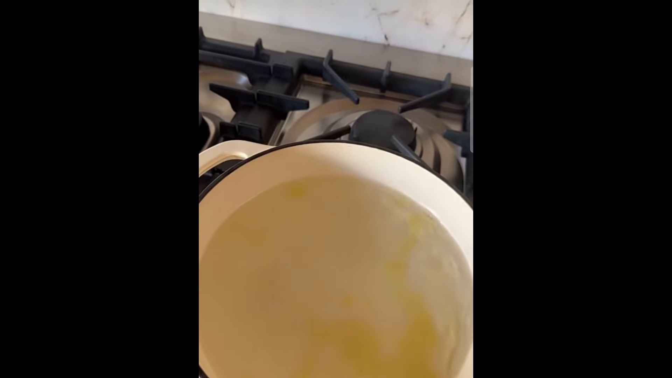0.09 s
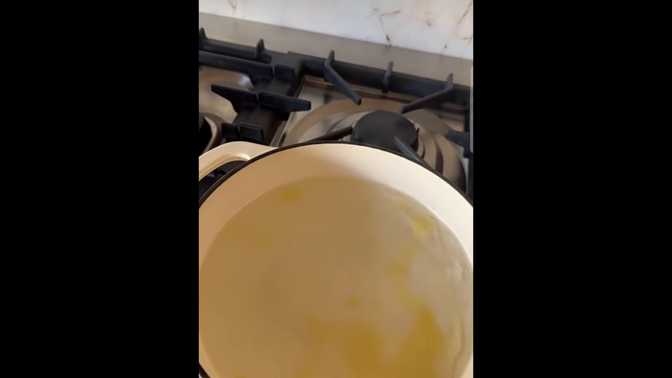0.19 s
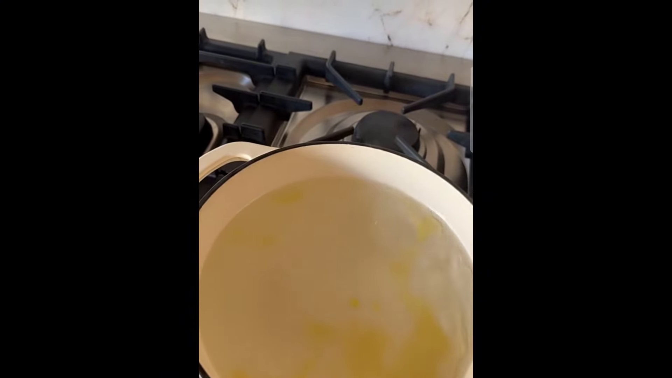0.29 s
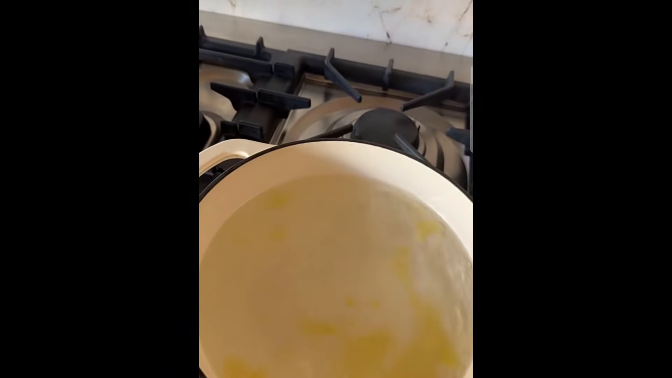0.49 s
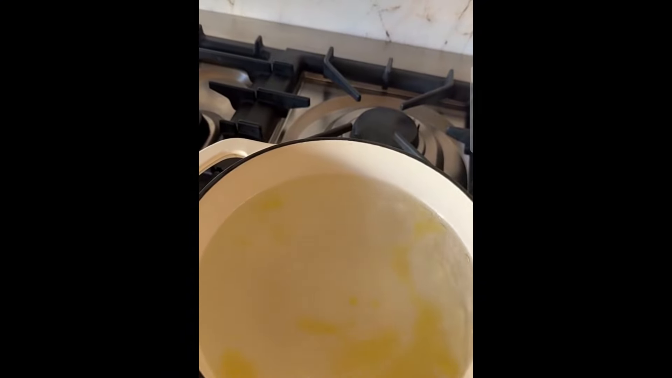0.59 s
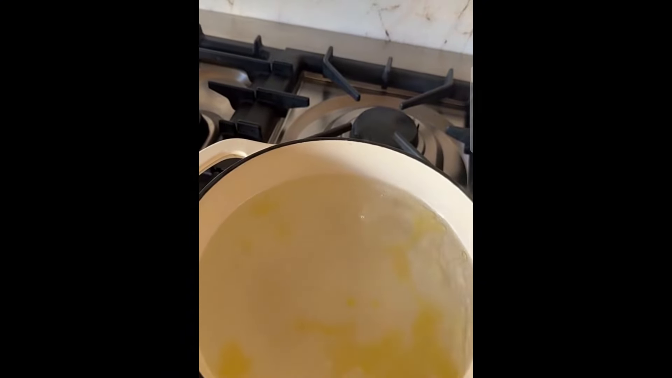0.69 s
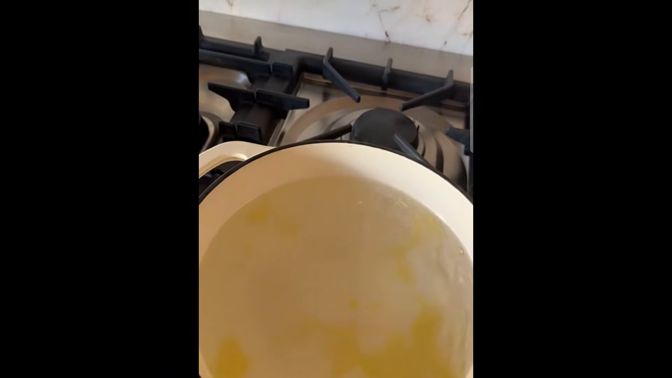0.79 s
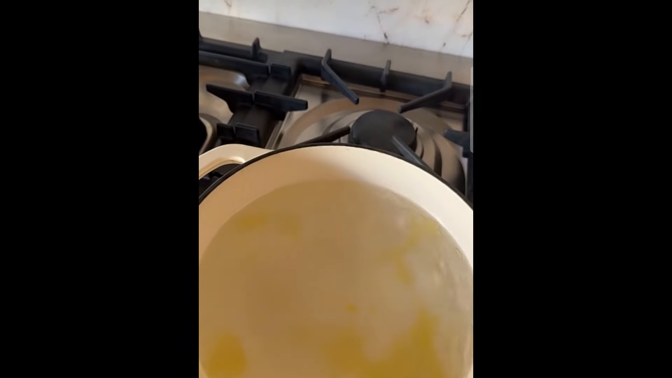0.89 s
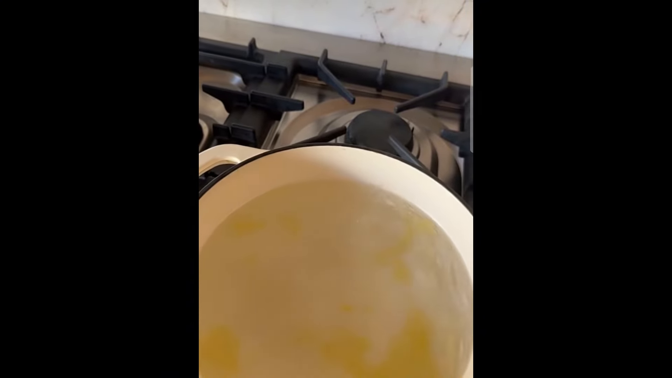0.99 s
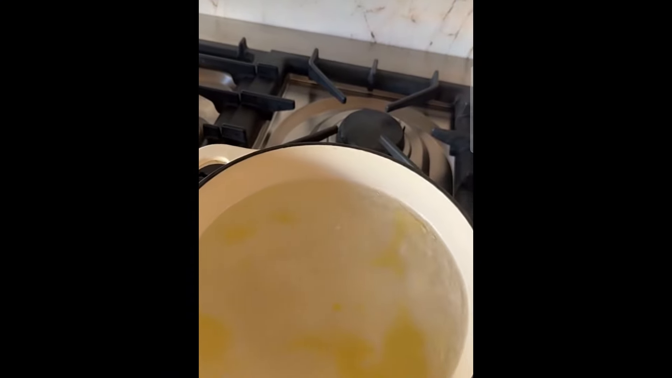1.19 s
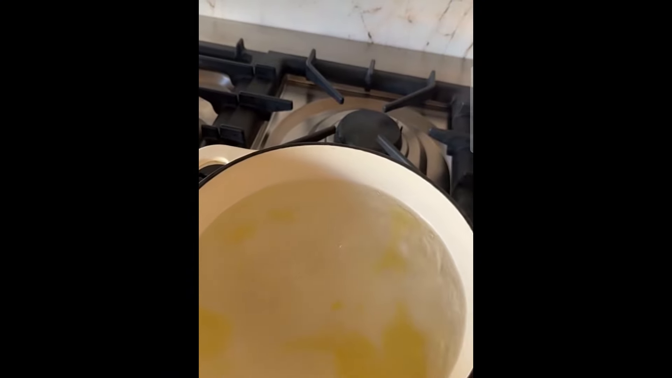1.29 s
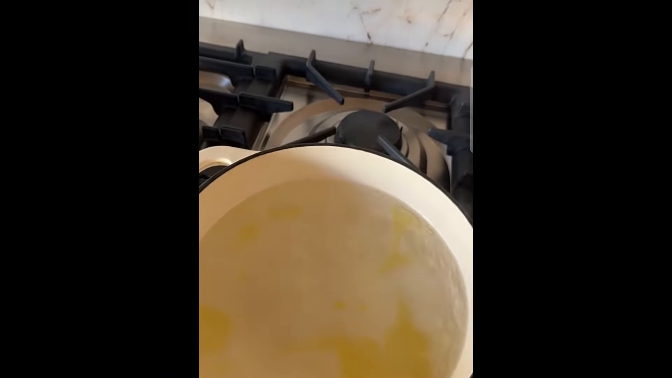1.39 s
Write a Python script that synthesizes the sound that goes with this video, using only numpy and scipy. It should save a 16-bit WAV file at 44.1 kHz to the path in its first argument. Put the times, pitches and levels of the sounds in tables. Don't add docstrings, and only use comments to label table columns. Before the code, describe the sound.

A hard metallic knock with a hollow boom and brief clatter, a quick bounce right after, then quiet simmering, thin burner hiss, light dry pasta ticks and faint squeaks, heard close in a home kitchen on a small microphone.

```python
import sys
import numpy as np
from scipy import signal
from scipy.io import wavfile
from scipy.ndimage import uniform_filter1d

SR = 44100
rng = np.random.default_rng(int(sys.argv[2]) if len(sys.argv) > 2 else 0)


def put_to_file(sound):
    columns = np.atleast_2d(sound).T
    safe = np.clip(columns, -1, 1)
    whole_steps = np.round(safe * 32767)
    wavfile.write(sys.argv[1], SR, whole_steps.astype(np.int16))


def rack_gain(trim_db):
    fader = np.asarray(trim_db, float)
    return 10 ** (fader / 20)


N = 61740

# [f/Hz, level/dB]
FLAME_SPECTRUM = [(3000, 6), (5200, -16), (6400, 1), (9000, -1.5), (10800, -16), (13500, -1.5),
                  (15500, 0.5)]
# [f/Hz, level/dB]
SIMMER_SPECTRUM = [(40, 3), (76, 6.5), (320, -4), (900, -2.5), (1200, -15), (2000, -9), (3300, -18.5),
                   (5000, -29.5)]
# [t/s, level/dB]
SIMMER_VIGOUR = [(0.0, -47.5), (0.194, -50), (0.432, -45), (0.768, -50), (1.4, -50.5)]
# [f/Hz, width/Hz, level/dB]
POT_WALL = [(80.6, 29, -1), (339, 111, -2), (700, 48, -9), (1349, 32, -7.5), (1548, 54, -4.5),
            (1828, 270, -2), (3580, 110, -20.5), (4340, 330, -20.5), (5750, 100, -21), (7200, 500, -20),
            (9180, 690, -24)]
# [t/s, length/s, f/Hz, level/dB]
SQUEAKS = [
    (0.562, 0.069, 3094, -49.5),
    (0.998, 0.21, 3380, -61.5),
    (1.054, 0.056, 3345, -55),
    (1.097, 0.071, 1545, -45.5),
    (1.144, 0.066, 342.6, -43.5),
]
# [t/s, peak level/dB, ring f/Hz, rustle level/dB, snap level/dB]
PASTA_TICKS = [(0.6747, -47, 6750, -16, -20), (.6837, -37, 6730, -8.5, -14), (0.797, -52, 5850, -5, 3),
               (1.001, -56, 6100, -2, -6), (1.069, -57, 7100, 3, 11), (1.078, -61, 7200, 13, 8),
               (1.119, -35.5, 7200, -9, -11.5), (1.128, -46, 6800, -4, -20), (1.168, -47, 6860, -10, -18),
               (1.2591, -55, 6400, -4, 3), (1.268, -46, 6700, -3, -10), (1.2922, -49, 6800, -5, -10),
               (.37, -62, 7850, 8, -7), (.46, -62, 8100, 6, -9)]
# [f/Hz, level/dB]
CLATTER_SPECTRUM = [(60, -14), (150, -13), (500, -1), (1000, -5.5), (2300, -5.5), (3200, -11.5),
                    (7000, -17), (15500, -19)]
# [f/Hz, t60/s]
CLATTER_DECAY = [(100, 0.71), (600, 0.48), (2500, 0.2), (6000, 0.12), (14000, 0.063)]
# [t/s, peak level/dB, contact hardness as cut-off f/Hz, thud f/Hz, thud level/dB]
BLOWS = [
    (0.2477, -8, 4040, 2160, -2.5),
    (0.252, -23, 900, 595, -23),
    (0.2586, -34.5, 700, 287, -14),
    (.283, -31.5, 900, 450, -14),
    (0.3256, -17.5, 1800, 589, -7),
    (.333, -23, 700, 369, -9),
    (.464, -33.5, 1090, 875, -23),
    (.47, -34, 700, 410, -26),
    (.895, -51, 997, 880, -36.5),
]
PANEL_HZ = [239, 347, 468, 545, 613, 639, 783, 820, 969, 1373, 1540, 1753, 1906, 2245]
# [level/dB, t60/s]
PANEL_MODES = [(-20, 0.16), (-7, 0.11), (-7.5, 0.093), (-6, 0.057), (-7, 0.23), (-13.5, 0.51), (-12, 0.2),
               (-2.5, 0.091), (-15.5, 0.1), (-11, 0.19), (-21, 0.22), (-11.5, 0.1), (-5.5, 0.28),
               (-15.5, 0.13)]
GRATE_HZ = [1095, 2503, 2680, 3020, 3639, 4027, 4290, 5243, 5997, 6290, 7219, 8952, 4255, 5300]
# [level/dB, t60/s]
GRATE_MODES = [(-22.5, 0.19), (-16.5, 0.12), (-21, 0.11), (-24, 0.022), (-20.5, 0.14), (-15, 0.12),
               (-12, 0.091), (-16.5, 0.06), (-6.5, 0.044), (-32, 0.11), (-33, 0.162), (-18, .1),
               (-34.5, 0.75), (-36, 0.65)]
# [f/Hz, level/dB, t60/s]
OVEN_BOOM = [(84.4, -6, 0.37), (92.95, -8, 0.59)]

FLAME_DB, FLAME_FLICKER_DB = -65.5, 0.5
SIMMER_OVER_DB, PATCHY_DB = -1, 4
TICK_T60_S, RUSTLE_T60_S, SNAP_T60_S = 0.017, 0.1, 0.029
RUSTLE_LOW_HZ, SNAP_LOW_HZ = 12400, 2820
CLATTER_DB, CLATTER_RISE_S = -11, 0.0017
ROOM_DB, ROOM_T60_S = -19.5, 0.67
RATTLE_DB, RATTLE_T60_S = -34, 0.26
SPREAD_DB = 1.5
TRAVEL_S = 0.00085
THUD_CYCLES, BOOM_SWELL_S = 16.7, 0.13
LOW_CUT_HZ, CUTOFF_HZ = 62, 15800


def rms_one(x):
    return x / np.sqrt(np.mean(x ** 2) + 1e-20)


def at_hz(points, hz):
    table_hz, values = np.array(points).T
    return np.interp(np.log(hz), np.log(table_hz), values)


def drift(rate):
    r = np.exp(-80 * np.pi * rate / SR)
    slow = signal.lfilter([1], [1, -2 * r, r * r], rng.standard_normal(N // 40 + 2002))[2000:]
    return np.interp(np.arange(N) / 40, np.arange(len(slow)), rms_one(slow - slow.mean()))


def click(s):
    return (np.arange(N) == int(s * SR)) + 1e-18


def ring(x, hz, t60):
    r, w = rack_gain(-60 / (t60 * SR)), 2 * np.pi * hz / SR
    return signal.lfilter([0, np.sin(w)], [1, -2 * r * np.cos(w), r * r], x)


def fade(x, t60):
    return signal.lfilter([1], [1, -rack_gain(-60 / (t60 * SR))], x)


def high_pass(x, order, hz):
    return signal.sosfilt(signal.butter(order, hz, "high", fs=SR, output="sos"), x)


def bands(spectrum):
    settle = 9000
    edges = 25 * 2 ** np.arange(0, 9.5, 1 / 3)
    white = rng.standard_normal((2, N + settle))
    hz = np.sqrt(edges[1:] * edges[:-1])
    noise = []
    for k, (low, high) in enumerate(zip(edges, edges[1:])):
        band_pass = signal.butter(2, [low, high], "band", fs=SR, output="sos")
        noise.append(signal.sosfilt(band_pass, white[k % 2])[settle:])
    level_db = at_hz(spectrum, hz) - 60 * (hz > 1.3 * spectrum[-1][0])
    noise = np.array(noise) * rack_gain(level_db)[:, None]
    return hz, noise / np.std(noise.sum(axis=0))


def flame():
    _, noise = bands([(1500, -60)] + FLAME_SPECTRUM)
    audible = noise[18:]
    return rack_gain(FLAME_DB) * sum(band * rack_gain(FLAME_FLICKER_DB * drift(10)) for band in audible)


def simmer():
    together, out = drift(6), 0
    for _, band in zip(*bands(SIMMER_SPECTRUM)):
        out = out + band * rack_gain(PATCHY_DB * (0.13 * together + drift(8.1)))
    for hz, width, db in POT_WALL:
        level = rack_gain(db + 1.66 * drift(10.3))
        t60 = np.log(1000) / np.pi / width
        out = out + level * rms_one(ring(rng.standard_normal(N), hz, t60))
    vigour_db = np.interp(np.arange(N) / SR, *np.transpose(SIMMER_VIGOUR))
    return rack_gain(vigour_db + SIMMER_OVER_DB) * out


def squeaks():
    t, out = np.arange(N) / SR, 0
    for s, span, hz, db in SQUEAKS:
        level = rack_gain(db + 2.1 * drift(40))
        swell = np.sin(np.pi * np.clip((t - s) / span, 0, 1)) ** 0.5
        out = out + level * swell * np.sin(2 * np.pi * hz * t + 1.5 * drift(60))
    return out


def pasta_ticks():
    white = rng.standard_normal(N)
    rustle_noise, snap_noise = high_pass(white, 2, RUSTLE_LOW_HZ), high_pass(white, 2, SNAP_LOW_HZ)
    rings = rustles = snaps = 0
    for s, db, hz, rustle_db, snap_db in PASTA_TICKS:
        hit = click(s)
        scrape = 0.24 * white * fade(hit, 0.012)
        rings = rings + rack_gain(db - 4.5) * ring(hit + scrape, hz, TICK_T60_S)
        rustles = rustles + rack_gain(db + rustle_db) * hit
        snaps = snaps + rack_gain(db + snap_db) * hit
    return rings + rustle_noise * fade(rustles, RUSTLE_T60_S) + snap_noise * fade(snaps, SNAP_T60_S)


def clatter():
    out, rise = 0, int(CLATTER_RISE_S * SR)
    for hz, band in zip(*bands(CLATTER_SPECTRUM)):
        hits = sum(rack_gain(db) * click(s) / np.sqrt(1 + (hz / cut_hz) ** 2) for s, db, cut_hz, *_ in BLOWS)
        hits = uniform_filter1d(np.roll(hits, int(CLATTER_RISE_S * SR / 2)), rise)
        loose_parts = fade(hits, at_hz(CLATTER_DECAY, hz))
        room = rack_gain(ROOM_DB) * fade(hits, ROOM_T60_S)
        out = out + band * (loose_parts + room)
    return rack_gain(CLATTER_DB) * out


def contact(s, db, cut_hz, grit):
    rattle = rack_gain(RATTLE_DB) * grit * fade(click(s), RATTLE_T60_S)
    return rack_gain(db) * signal.lfilter(*signal.butter(2, cut_hz, fs=SR), click(s) + rattle)


def panel_and_grate():
    out, luck = np.zeros(N), rng.standard_normal((len(BLOWS), 32))
    grit = rng.standard_normal(N)
    pushes = [contact(s, db, cut_hz, grit) for s, db, cut_hz, *_ in BLOWS]
    modes = zip(PANEL_HZ + GRATE_HZ, PANEL_MODES + GRATE_MODES)
    for k, (hz, (db, t60)) in enumerate(modes):
        push = rack_gain(db + SPREAD_DB * luck[:, k]) @ pushes
        delay = int(TRAVEL_S * SR * 1000 / hz)
        out += (-1) ** k * np.roll(ring(push, hz, t60), delay)
    return out


def thuds():
    out = 0
    for s, _, _, hz, db in BLOWS:
        push = np.hanning(int(SR / hz)) * 4 * hz / SR
        out = out + rack_gain(db) * ring(np.convolve(click(s), push)[:N], hz, THUD_CYCLES / hz)
    return out


def oven_boom():
    heave = sum(rack_gain(db) * click(s) for s, db, *_ in BLOWS)
    out = 0
    for hz, db, t60 in OVEN_BOOM:
        out = out + rack_gain(db) * (ring(heave, hz, t60) - ring(heave, hz, BOOM_SWELL_S))
    return out


def knock():
    return panel_and_grate() + thuds() + oven_boom()


def scene():
    return (knock() + clatter() + simmer() + flame() + pasta_ticks() + squeaks())[None]


def band_limit(x):
    return signal.sosfilt(signal.butter(12, 16440, fs=SR, output="sos"), x)


def record(dry):
    x = high_pass(dry, 3, LOW_CUT_HZ)
    x = signal.sosfilt(signal.ellip(12, 0.5, 60, CUTOFF_HZ, fs=SR, output="sos"), x)
    return band_limit(x)


dry = scene()
out = record(dry)
put_to_file(out)
```